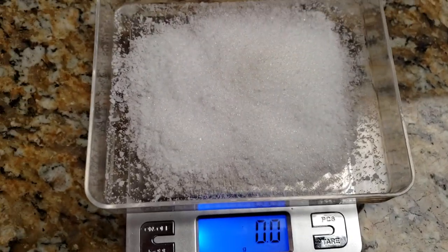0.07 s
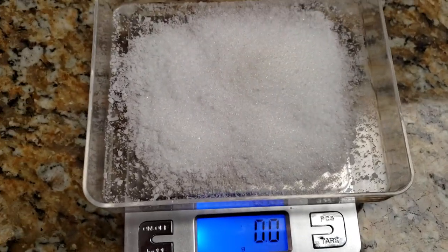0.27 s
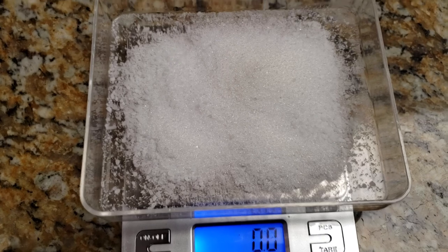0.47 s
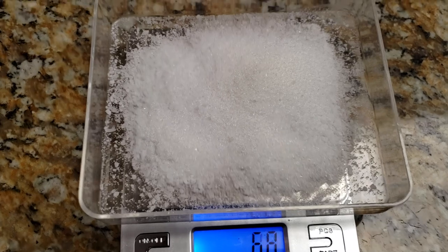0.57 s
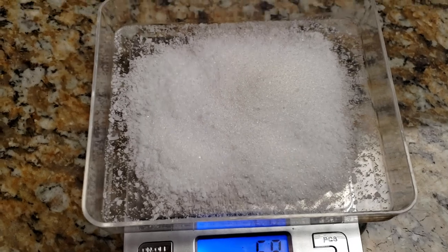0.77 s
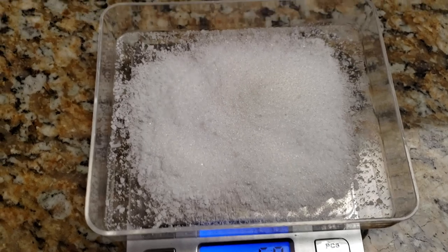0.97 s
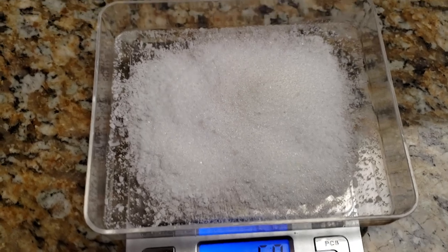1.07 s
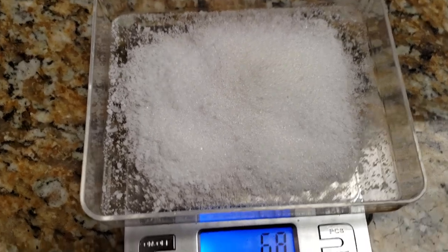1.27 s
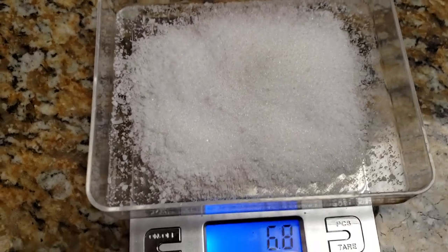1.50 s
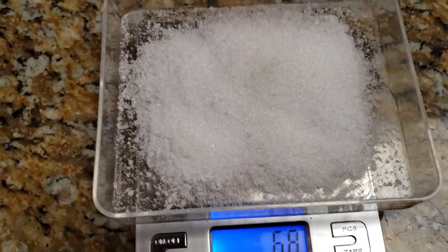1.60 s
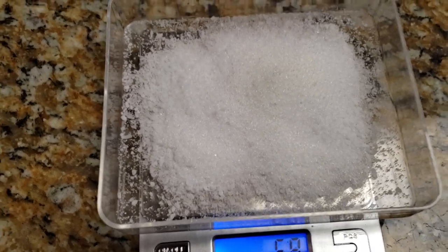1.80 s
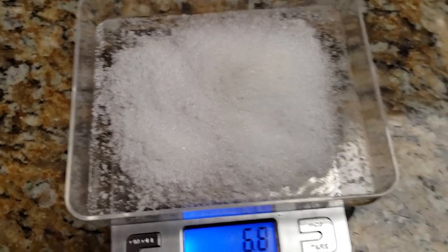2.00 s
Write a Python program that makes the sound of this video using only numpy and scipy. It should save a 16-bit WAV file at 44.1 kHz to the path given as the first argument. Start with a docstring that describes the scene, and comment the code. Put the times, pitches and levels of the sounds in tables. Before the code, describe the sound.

Grainy sugar sounds, close to a hand-held phone in a kitchen: handling bumps and a sharp hollow knock, a short rustling scoop, then grains and clumps pattering into a plastic tray, growing duller before stopping.

```python
"""Spooning sugar into a tray

A spoon scoops granulated sugar and tips it into a plastic tray on a kitchen scale, near a hand-held phone.
The container bumps and knocks: short bursts of contact excite its resonances. Showers of random
impulses make the rustle of crystals and the hiss of falling grains; a drifting tone sings on the spoon.
The stream and a few clumps ring the tray's modes and thin out, in a small kitchen with a faint noise floor."""
import sys
import numpy as np
from scipy import signal
from scipy.fft import rfft, irfft
from scipy.io import wavfile

SR = 44100
rng = np.random.default_rng(int(sys.argv[2]) if len(sys.argv) > 2 else 0)


def master_out(mix):
    """Clip the mix to full scale and print it as 16-bit PCM to the path in sys.argv[1]."""
    frames = np.transpose(np.atleast_2d(mix))
    ceiling = np.clip(frames, -1, 1)
    pcm = np.round(ceiling * 32767).astype(np.int16)
    wavfile.write(sys.argv[1], SR, pcm)


N = 90404


def db_to_gain(db):
    """Decibel law: 20 dB is a factor of ten in amplitude."""
    return 10 ** (np.asarray(db) / 20)


def unit(x):
    """Normalization: scale to an rms value of 1."""
    return x / np.sqrt(np.mean(np.abs(x) ** 2))


def clock():
    """Sampling: the time of every sample [s]."""
    return np.arange(N) / SR


def freqs():
    """Discrete spectrum: the frequency of every bin of the zero-padded transform [Hz]."""
    return np.arange(N + 1) * SR / (2 * N)


def decay(age, t60):
    """Exponential decay: the level falls 60 dB in t60 seconds."""
    return np.exp(-np.log(1000) * age / t60)


def curve(rows):
    """Envelope: gain interpolated in dB along (time, level), fading exponentially outside the points."""
    times, db = np.array(rows).T
    t = clock()
    outside = np.abs(t - np.clip(t, times[0], times[-1]))
    return db_to_gain(np.interp(t, times, db)) * np.exp(-outside / 0.077)


def gains(points):
    """Spectral envelope: gain per bin, interpolated in dB over log frequency."""
    hz, db = np.array(points).T
    return db_to_gain(np.interp(np.log(freqs() + 1), np.log(hz), db))


def apply(x, response):
    """Linear filtering: convolution is multiplication of spectra."""
    return irfft(rfft(x, 2 * N) * response)[..., :N]


def colour(points):
    """Minimum phase: folding the cepstrum gives a causal response that keeps white noise power."""
    cepstrum = irfft(np.log(unit(gains(points))))
    cepstrum[1:N] *= 2
    cepstrum[N + 1:] = 0
    return np.exp(rfft(cepstrum))


def body(modes):
    """Modal superposition: summed steep resonances, scaled to keep white noise power."""
    f = freqs()
    total = 0
    for k, (hz, width, db) in enumerate(modes):
        resonance = 1j * f * width / (hz ** 2 - f ** 2 + 1j * f * width)
        # squaring steepens the skirts; each mode is a quarter turn of phase from the last
        total = total + db_to_gain(db) * resonance ** 2 * 1j ** k
    return unit(total)


def grains(rate, spread_db):
    """Shot noise: three unrelated showers of tiny impacts, a few much larger than the rest."""
    size = db_to_gain(spread_db * np.minimum(rng.exponential(size=(3, N)), 5))
    sign = np.sign(rng.standard_normal((3, N)))
    struck = rng.random((3, N)) < rate / SR
    return unit(size * sign * struck)


def patchy(depth_db):
    """Slow modulation: smoothed noise in dB is the gain of an uneven flow."""
    smoothing = np.exp(-(freqs() * 0.008) ** 2)
    return db_to_gain(depth_db * unit(apply(rng.standard_normal(N), smoothing)))


def skitter(x, length=0.003):
    """All-pass dispersion: each crystal bounces on briefly, softening its tick but keeping its colour."""
    bounces = rng.standard_normal((3, N)) * np.exp(-clock() / length)
    phase = np.angle(rfft(bounces, 2 * N))
    return apply(x, np.exp(1j * phase))


BURST_TAIL, BURST_TAIL_DB = 3.86, -12.5  # decay of the tail in burst lengths, and its level


def bursts(rows, response, rise=0.4, core=0, size=12000):
    """Forced vibration: short avalanches of contacts excite a body; rise, brief hold, weak tail."""
    out = np.zeros((3, N + size))
    ringing = irfft(response)[None, :size // 3]
    for time, db, length in rows:
        start = int(time * SR)
        age = np.arange(size) / SR / length  # in burst lengths
        hold = np.exp(-age ** 2 / 2)
        tail = db_to_gain(BURST_TAIL_DB) * np.exp(-age / BURST_TAIL)
        env = (1 - np.exp(-age / rise)) * (hold + tail)
        push = env * np.sign(rng.standard_normal((3, size)))
        # the core strikes in one piece at the peak
        push[:, np.argmax(env)] += core * np.sqrt(np.sum(env ** 2))
        hit = signal.fftconvolve(push, ringing, axes=1)[:, :size]
        # energy: the given level held for the burst length
        scale = np.sqrt(length * SR / np.sum(hit ** 2, axis=1, keepdims=True))
        out[:, start:start + size] += hit * db_to_gain(db) * scale
    return out[:, :N]


def blows(rows, response):
    """Impulse response: single hard contacts ring a body, with energy set as a level over 1 ms."""
    push = np.zeros((3, N))
    for time, db in rows:
        push[:, int(time * SR)] += db_to_gain(db) * np.sqrt(SR / 1000)
    return apply(push, response)


MIC_LAG_S, CONTAINER_LAG_S = 0.0004406, 0.00034  # the left microphone is farther away
GRAIN_SCATTER, HIT_SCATTER, TRAY_SCATTER = 0.87, 0.69, 0.26  # shares of power
KNOCK_SCATTER, LOW_SCATTER = 0.1, 0.039  # shares of power


def microphones(three, scatter, lag=MIC_LAG_S):
    """Partial coherence: one shared sound, later on the left, plus an unrelated share on each side."""
    share = np.clip(scatter, 0, 1)
    left = apply(three[0], np.exp(-2j * np.pi * freqs() * lag))
    shared = np.array([left, three[0]])
    return np.sqrt(1 - share) * shared + np.sqrt(share) * three[1:]


def room(x, wet_db):
    """Reverberation: a short diffuse tail of decaying noise is added to the direct sound."""
    t = clock()
    tail = rng.standard_normal((2, N)) * decay(t, 0.39) * (1 - np.exp(-t / 0.0012))
    response = rfft(unit(tail), 2 * N) / np.sqrt(N)
    return x + db_to_gain(wet_db) * apply(x, response)


# colour of the kitchen's steady noise: (frequency [Hz], relative level [dB])
ROOM_TONE_COLOUR = [(25, -6), (95, -6.5), (300, -19), (600, -22), (800, -14), (1200, -16.5), (1700, -13),
                    (2500, -25.5), (3600, -12.5), (4600, -26), (5800, -27.5), (7500, -37), (14000, -32.5)]


def room_tone():
    """Stationary noise: filtered white noise, unrelated at the two microphones."""
    noise = microphones(rng.standard_normal((3, N)), 1.0)
    return apply(noise, colour(ROOM_TONE_COLOUR)) * db_to_gain(-68.5)


# the container's hollow rubbing: (time [s], level [dB])
RUB_LEVEL = [(.14, -76.5), (.2, -61), (.25, -37), (.29, -43), (.32, -46.5), (.4, -53), (.52, -51.5),
             (.58, -58), (.66, -55.5), (.75, -55), (.83, -63), (.9, -68), (1.0, -66), (1.05, -55),
             (1.16, -56), (1.22, -65.5), (1.45, -71), (1.6, -70), (1.8, -86)]
# colour of rubbing and thumps: (frequency [Hz], relative level [dB])
RUB_COLOUR = [(40, -11.5), (90, -11), (140, 4.5), (190, -6), (235, 0), (275, 4), (310, -1.5), (355, 1),
              (410, 2.5), (520, -11), (1000, -7.5), (2000, -31.5)]
# hollow thumps of the container: (time [s], level over 1 ms [dB])
THUMPS = [(.512, -43), (.751, -42.5), (.812, -47.5)]
# soft handling bumps: (time [s], level [dB], length [s])
BUMPS = [(.21, -43.5, 0.035), (.2425, -32.5, 0.0098), (.264, -32.5, 0.01), (.295, -48.5, 0.018)]
# colour of the bumps: (frequency [Hz], relative level [dB])
BUMP_COLOUR = [(20, -14), (45, -2), (65, -7), (84, 6), (105, -4.5), (200, -1), (400, -26), (900, -39),
               (2500, -63)]
# deep thuds of the hand holding the phone: (time [s], level [dB], length [s])
THUDS = [(1.135, -52, 0.016), (1.21, -58.5, 0.039), (1.355, -56.5, 0.048), (1.68, -54.5, 0.036)]
# resonances of the thuds: (frequency [Hz], width of each of two stages [Hz], relative level [dB])
THUD_MODES = [(44, 18, 0), (82, 36, -0.85)]


def handling():
    """Friction and soft impact: low rubbing, hollow thumps, bumps and thuds of things held in the hand."""
    hollow = colour(RUB_COLOUR)
    rub = apply(rng.standard_normal((3, N)) * curve(RUB_LEVEL), hollow)
    thumps = blows(THUMPS, hollow)
    bumps = bursts(BUMPS, colour(BUMP_COLOUR), rise=0.25)
    thuds = bursts(THUDS, body(THUD_MODES))
    return microphones(rub + thumps + bumps + thuds, LOW_SCATTER)


# the container's resonances: (frequency [Hz], width of each of two stages [Hz], relative level [dB])
CONTAINER_MODES = [(790, 110, -15), (912, 238, 3), (966, 47, 3), (1790, 330, -10.5)]
# sharp blows of the spoon on the container: (time [s], level over 1 ms [dB])
BLOWS = [(.4248, -15), (.4382, -19.5)]
# the spoon scraping along the container: (time [s], level [dB], length [s])
SCRAPES = [(.431, -32.5, 0.016), (.478, -53, 0.0066)]
# dull taps and brushes of the spoon: (time [s], level [dB], length [s])
TAPS = [(.2418, -28, 0.0016), (.2745, -32, 0.00087), (.364, -41.5, 0.0038), (.402, -46.5, 0.014),
        (.51, -43, 0.0048), (.635, -52.5, 0.014), (.75, -52, 0.0043), (1.147, -50.5, 0.0054),
        (1.64, -63.5, 0.11)]
# colour of the taps: (frequency [Hz], relative level [dB])
TAP_COLOUR = [(30, -18), (100, -10.5), (250, -0.5), (600, -3), (950, 3), (1500, -10), (3600, -13.5),
              (4600, -31), (12000, -38)]


def container():
    """Modal excitation: knocks and scrapes ring the hollow container; dull taps of the spoon join them."""
    hollow = body(CONTAINER_MODES)
    knocks = microphones(blows(BLOWS, hollow), 0, CONTAINER_LAG_S)
    scrapes = bursts(SCRAPES, hollow)
    taps = bursts(TAPS, colour(TAP_COLOUR), rise=0.057)
    return knocks + microphones(scrapes + taps, KNOCK_SCATTER, CONTAINER_LAG_S)


# the scooping rustle: (time [s], level [dB])
SCOOP_LEVEL = [(.05, -77.5), (.19, -59.5), (.25, -55), (.28, -49), (.31, -59.5), (.39, -60), (.43, -42.5),
               (.46, -40.5), (.48, -40.5), (.515, -46), (.55, -60), (.63, -68.5), (.665, -48), (.69, -54.5),
               (.73, -56.5), (.79, -72.5), (.87, -59.5)]
# colour of the rustle: (frequency [Hz], relative level [dB])
SCOOP_COLOUR = [(300, -32.5), (700, -6.5), (1100, -2.5), (1500, 1), (3900, 3), (4600, -12), (5700, 1),
                (7600, -12), (8700, -8), (10500, -4), (12500, -2.5), (14500, -8)]
# crystals crushed at the spoon: (time [s], level [dB], length [s])
CRUNCHES = [(.271, -31.5, 0.0028), (.3405, -36.5, 0.0028), (.363, -37.5, 0.004), (.402, -42, 0.004),
            (.502, -33, 0.0067), (.6068, -46, 0.0024), (.6443, -46, 0.0017), (.6568, -40, 0.0053),
            (.7241, -42.5, 0.0023), (.7501, -41.5, 0.0027), (.8155, -54, 0.0011), (1.0125, -26, 0.0039),
            (1.169, -44, 0.0041), (1.1812, -26, 0.0011), (1.206, -35.5, 0.0043), (1.3915, -42, 0.0013),
            (1.4115, -40.5, 0.002)]
# colour of the crunches: (frequency [Hz], relative level [dB])
CRUNCH_COLOUR = [(300, -11), (900, -15.5), (1500, -3.5), (3200, 4.5), (4000, 0), (4700, -4.5), (5600, 2.5),
                 (7400, 1.5), (10500, 1.5), (12000, 4), (14500, -2)]


def scoop():
    """Granular friction: the spoon rustles through many small contacts and crushes some crystals."""
    contacts = skitter(grains(rate=15000, spread_db=5.5))
    rustle = microphones(contacts, GRAIN_SCATTER) * curve(SCOOP_LEVEL) * patchy(depth_db=1.9)
    crunches = bursts(CRUNCHES, colour(CRUNCH_COLOUR), rise=0.96)
    return apply(rustle, colour(SCOOP_COLOUR)) + microphones(crunches, HIT_SCATTER)


# grains sliding along the spoon: (time [s], resonance [Hz], level [dB])
SLIDE = [(.87, 3415, -69), (0.917, 3386, -50), (0.961, 3307, -56.5), (1.001, 3134, -54.5),
         (1.035, 3298, -73), (1.049, 3332, -41), (1.098, 3550, -52.5), (1.116, 3520, -41),
         (1.145, 3360, -45), (1.182, 3263, -51)]


def spoon():
    """Narrow-band noise and free decay: sliding grains sing in a drifting band; the spoon rings low once."""
    times, hz, db = np.array(SLIDE).T
    t = clock()
    # slow noise multiplying a tone spreads it into a narrow band
    low_pass = 1 / (1 + 1j * freqs() / 170) ** 2
    flutter = unit(apply(rng.standard_normal((3, N)), low_pass))
    phase = 2 * np.pi * np.cumsum(np.interp(t, times, hz)) / SR
    song = flutter * unit(np.sin(phase)) * curve(np.c_[times, db])
    age = np.maximum(t - 1.015, 0)
    ring = db_to_gain(-38.5) * (1 - np.exp(-age / 0.002)) * np.sin(2 * np.pi * 425 * age)
    return microphones(song, GRAIN_SCATTER) + ring * decay(age, 0.078)


# the tray's resonances: (frequency [Hz], width of each of two stages before clump damping [Hz],
# relative level [dB])
TRAY_MODES = [(1001, 53, -16), (1930, 275, -12), (2032, 216, -12), (2483, 145, -0.5), (2835, 105, -5.5),
              (3446, 110, -13.5), (3240, 720, -10.5), (3560, 155, -9.5), (3941, 223, 5.5), (4026, 135, 6),
              (4120, 433, -7.5)]
# clumps landing in the tray: (time [s], level [dB], length [s], tilt [dB per octave])
CLUMPS = [(1.109, -39, .0047, 1), (1.208, -32, 0.0011, 15), (1.2415, -33.5, .002, 3),
          (1.258, -29.5, 0.00475, 0), (1.279, -32, 0.0022, -7.5), (1.33, -39, 0.0015, 11),
          (1.343, -30.5, 0.0012, 8), (1.3586, -27.5, 0.0029, 6.5), (1.387, -35, 0.0014, 4),
          (1.41, -34.5, 0.002, -5.5), (1.471, -34, 0.0015, 7.5), (1.5234, -33, 0.0014, 9),
          (1.587, -37.5, 0.00345, 4), (1.613, -37.5, .0036, -13.5), (1.6478, -43, .0035, -15),
          (1.695, -39.5, 0.0019, -13.5), (1.7336, -34, 0.0015, -6), (1.742, -40, 0.0022, -20)]


def clumps():
    """Damped impact: each clump widens the tray's modes and rings them, brighter or duller by where it lands."""
    damped = [(hz, width * 1.31, db) for hz, width, db in TRAY_MODES]
    tray = body(damped)
    octaves = np.log2(np.clip(freqs(), 1500, 6000))  # the tilt acts within these limits
    total = np.zeros((3, N))
    for time, db, length, tilt in CLUMPS:
        tilted = tray * db_to_gain(tilt * octaves)
        total += bursts([(time, db, length)], tilted, rise=0.15, core=0.53)
    return total


# strength of the stream landing in the tray: (time [s], level [dB])
STREAM_LEVEL = [(.88, -68.5), (.93, -59), (1.0, -55.5), (1.1, -51), (1.18, -37.5), (1.22, -45.5),
                (1.29, -40.5), (1.32, -42), (1.38, -49), (1.44, -55), (1.51, -44), (1.55, -39.5),
                (1.6, -42.5), (1.67, -48), (1.74, -34), (1.772, -44.5), (1.795, -68)]
# hiss of the falling grains: (time [s], level [dB])
HISS_LEVEL = [(.86, -65.5), (.93, -53), (1.0, -52), (1.03, -65), (1.08, -49), (1.15, -44.5), (1.18, -37.5),
              (1.22, -49), (1.27, -42), (1.33, -51.5), (1.39, -52.5), (1.44, -68), (1.49, -56.5),
              (1.6, -57.5), (1.67, -70), (1.74, -56), (1.81, -75)]
# colour of the hiss: (frequency [Hz], relative level [dB])
HISS_COLOUR = [(700, -41), (1100, 4), (2500, 6), (4000, 0), (4700, 9), (5700, 15), (6500, 12.5),
               (7400, 13.5), (8700, 9.5), (13000, 11), (14500, 7.5)]
# the growing heap damps the tray's upper modes
DAMP_FROM_S, DAMP_DB_PER_S, DAMP_ABOVE_HZ = 1.383, 49.5, 2330


def pour():
    """Random impact excitation: stream and clumps hiss on the heap and ring the tray, which dulls as it is covered."""
    shower = grains(rate=20000, spread_db=4.5) * patchy(depth_db=2.2)
    heap = colour(HISS_COLOUR)
    rings = apply(shower * curve(STREAM_LEVEL), body(TRAY_MODES))
    lower = apply(rings, 1 / (1 + (freqs() / DAMP_ABOVE_HZ) ** 10))
    covering = np.maximum(clock() - DAMP_FROM_S, 0)
    rings = lower + (rings - lower) * db_to_gain(-DAMP_DB_PER_S * covering)
    hiss = apply(skitter(shower) * curve(HISS_LEVEL), heap)
    clump_hiss = bursts([row[:3] for row in CLUMPS], heap, rise=0.7)
    hiss = hiss + db_to_gain(-13) * clump_hiss
    return microphones(rings + clumps(), TRAY_SCATTER) + microphones(hiss, GRAIN_SCATTER)


def scene():
    """Superposition: all sources add; the room answers all but handling and the noise floor."""
    knocks = room(container(), wet_db=-12.5)
    sugar = room(scoop() + spoon() + pour(), wet_db=-11.5)
    return room_tone() + handling() + knocks + sugar


# left minus right level of the two microphones: (frequency [Hz], difference [dB])
BALANCE = [(80, 1), (400, -0.5), (1200, 5), (1900, 13), (2450, 1.5), (3300, 8), (4000, 10), (4500, -3),
           (7200, -2.5), (8500, 12), (11000, -2)]


def record(dry):
    """Transducer response: each microphone has its own colour; the deep bass and the top are cut."""
    lean = np.sqrt(gains(BALANCE))  # half the difference on each side
    low_cut = (1j * freqs() / (20.5 + 1j * freqs())) ** 2
    heard = apply(dry, np.array([lean, 1 / lean]) * low_cut)
    top_cut = signal.ellip(8, .2, 70, 14600, fs=SR, output="sos")
    return signal.sosfilt(top_cut, heard)


dry = scene()
out = record(dry)
master_out(out)
```